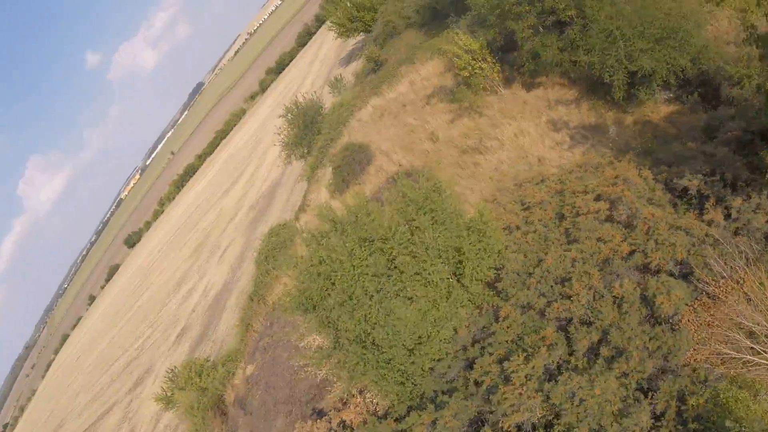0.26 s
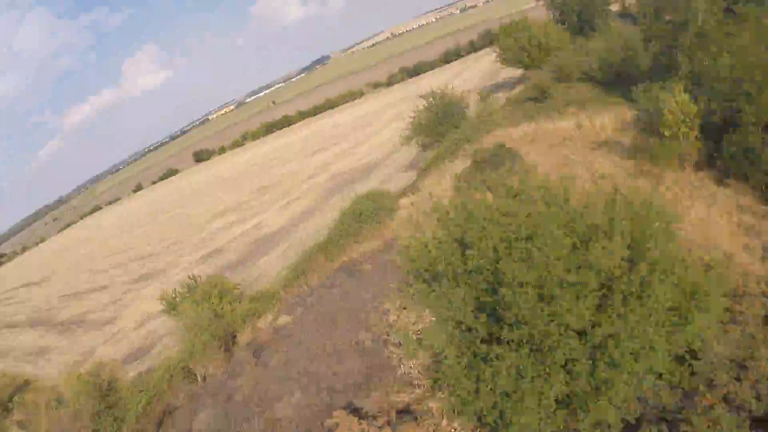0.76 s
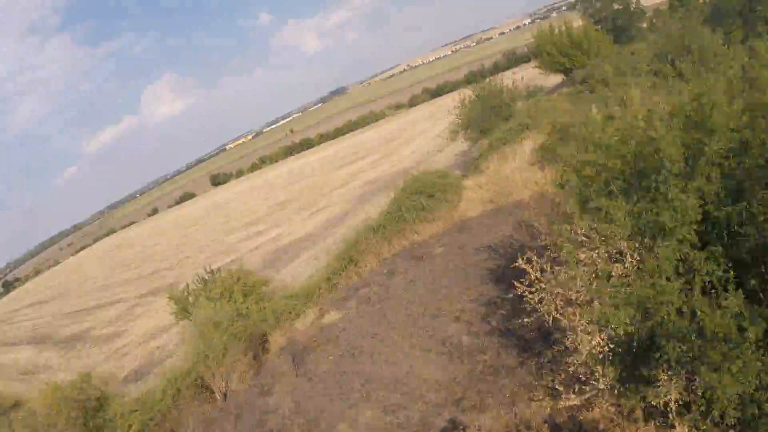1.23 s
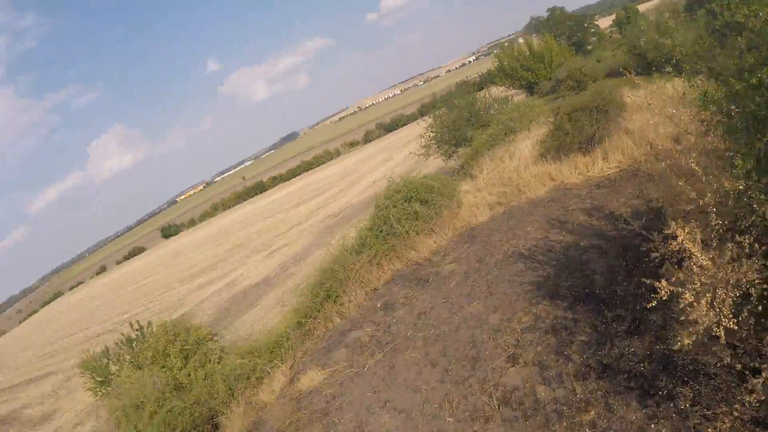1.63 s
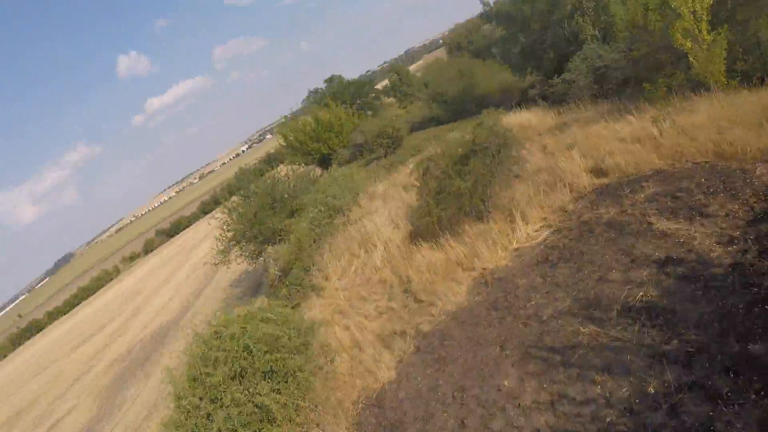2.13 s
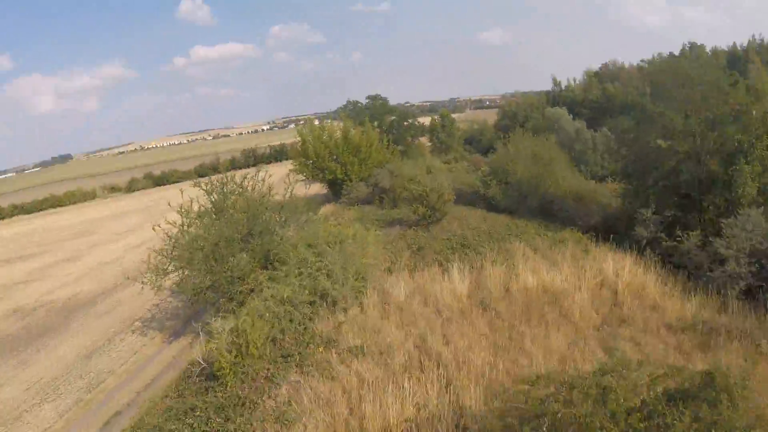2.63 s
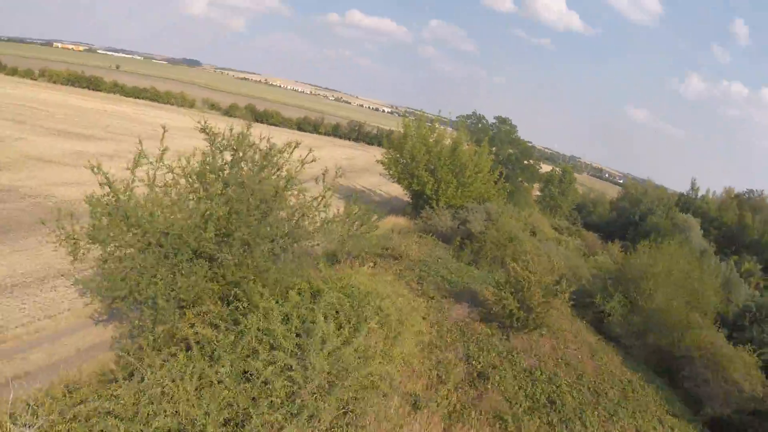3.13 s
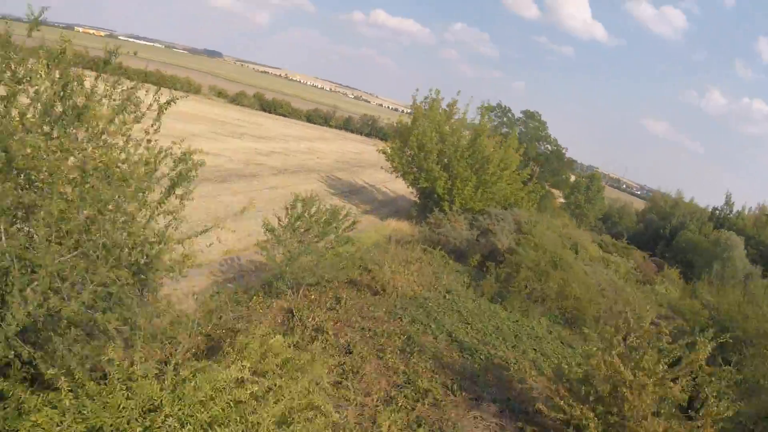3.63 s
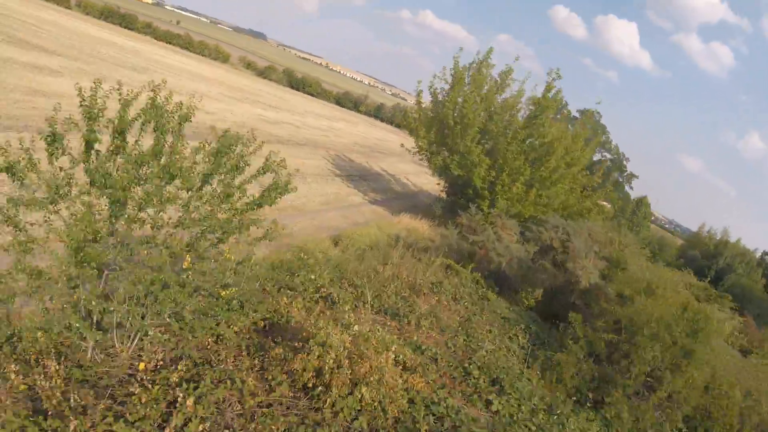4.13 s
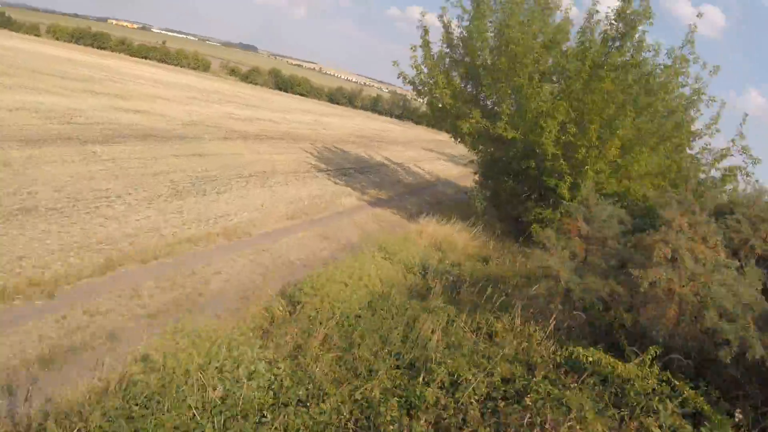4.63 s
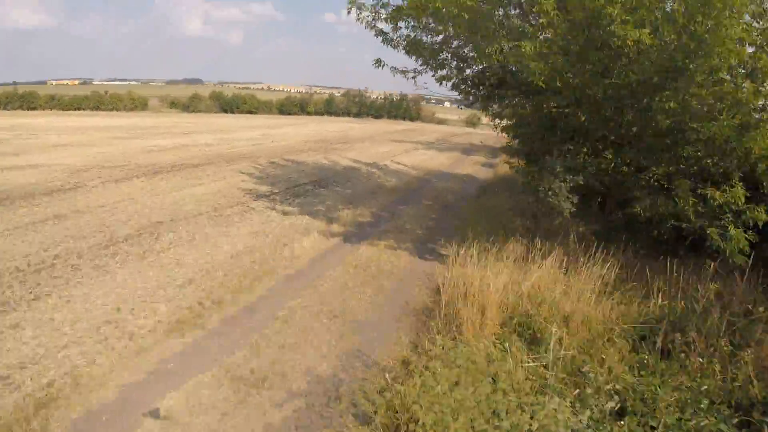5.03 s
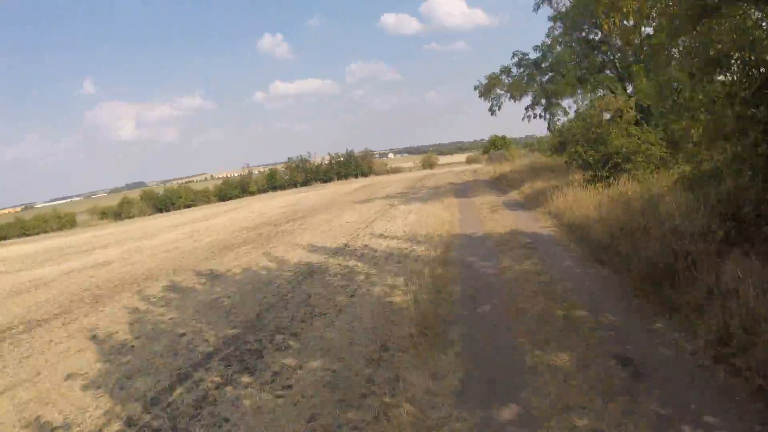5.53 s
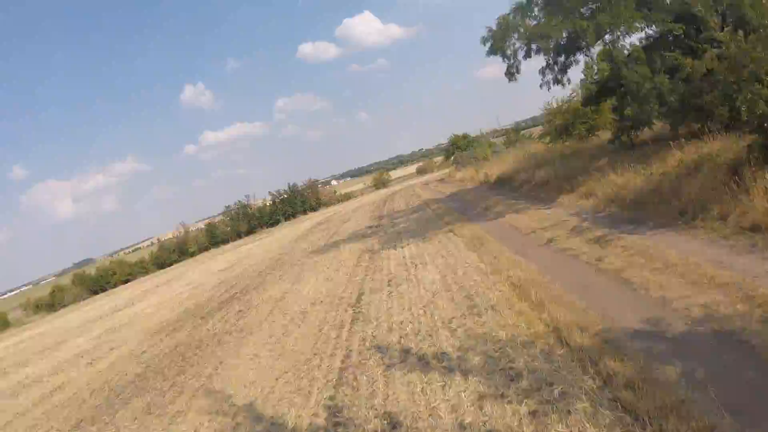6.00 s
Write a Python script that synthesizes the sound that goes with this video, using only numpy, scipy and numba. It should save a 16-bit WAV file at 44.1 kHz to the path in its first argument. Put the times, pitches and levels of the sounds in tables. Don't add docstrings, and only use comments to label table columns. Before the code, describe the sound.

A small racing quadcopter is heard from a camera on its own frame, close and slightly muffled by a sealed case, with peaks held back. At 0 s the motors hum low and uneven, beating against each other, while a puff of dive wind fades within about 0.3 s. Around 0.9-1.3 s the throttle surges: pitch more than doubles into a harsh buzzing whine with rasping blade slap and stronger air hiss, edging higher until about 2.1 s. From 2.2 to 2.5 s it falls quickly to a lower, throbbing drone that holds until 3.8 s, with a faint thin whistle near 2.7 s. It rises again by 4.1 s, with small pushes near 4.3 and 5.2 s, uneven pulsing, and faint high singing tones. From 5.5 s to the end at 6.3 s it stays a dense, steady, beating buzz in rushing air.

```python
import sys
import numpy as np
from scipy import signal
from scipy.fft import rfft, irfft, next_fast_len
from scipy.io import wavfile
from scipy.ndimage import uniform_filter1d
from numba import njit

SR = 44100
rng = np.random.default_rng(int(sys.argv[2]) if len(sys.argv) > 2 else 0)


def put_to_file(sound):
    columns = np.atleast_2d(sound).T
    safe = np.clip(columns, -1, 1)
    whole_steps = np.round(safe * 32767)
    wavfile.write(sys.argv[1], SR, whole_steps.astype(np.int16))


def elevation(decibels):
    levels = np.asarray(decibels, float)
    return 10 ** (levels / 20)


N = 276066
TIME_S = np.arange(N) / SR


def curves(table):
    seconds, *columns = np.transpose(table)
    return [np.interp(TIME_S, seconds, column) for column in columns]


def colour_db(table, hz):
    table_hz, db = np.transpose(table)
    return np.interp(np.log(hz), np.log(table_hz), db)


def gate(start, end, fade=0.037):
    return np.interp(TIME_S, [start - fade, start, end, end + fade], [0, 1, 1, 0])


def walk(per_second):
    hold = int(SR / per_second)
    steps = np.repeat(rng.standard_normal(N // hold + 1), hold)
    return 1.3 * uniform_filter1d(uniform_filter1d(steps, hold), hold)[:N]


def shaft_speed(speed_hz):
    # start in seconds, end in seconds, ease in seconds,
    # change of speed as a share.
    stick = [
        (4.221, 4.369, .11, .065),
        (5.129, 5.269, .13, .045),
        (5.598, 5.629, .1, -.02),
    ]
    inertia_s, hunting_share, jitter_share = .035, .003, 0.00199
    nudges = hunting_share * walk(8)
    for start, end, ease, share in stick:
        nudges = nudges + share * gate(start, end, ease)
    smooth_hz = uniform_filter1d(speed_hz * (1 + nudges), int(inertia_s * SR))
    return smooth_hz * (1 + jitter_share * walk(25.154))


def mount_ring_db(hz):
    # pitch in Hz, width in octaves, boost in dB.
    mount = [
        (260.4, 0.15, 9.5),
        (454, 0.084, 5.5),
        (532.9, 0.051, 10),
        (695, 0.082, 1),
        (900, 0.29, 0.5),
    ]
    return sum(db * np.exp(-(np.log2(hz / centre) / width) ** 2) for centre, width, db in mount)


def motor(number, table, orders_db, buzz_db):
    speed_hz, shake_db, load_db = curves(table)
    hz = shaft_speed(speed_hz)
    angle = 2 * np.pi * np.cumsum(hz) / SR
    wander_db, rough_db = 0.76, 1.8
    shakes = []
    for multiple, order_db, heard_db in zip((1, 2, 3), orders_db, (shake_db, shake_db, load_db)):
        db = order_db + heard_db + mount_ring_db(multiple * hz)
        db = db + wander_db * walk(6) + rough_db * walk(30)
        shakes.append(elevation(db) * np.exp(1j * (multiple * angle + 7 * rng.random())))
    sound = sum(shakes).imag + frame_buzz(hz, angle, buzz_db) + wake_slaps(number, angle)
    running = np.sqrt(2) * gate(table[0][0], table[-1][0])
    return running * sound, running * shakes[0], angle


def frame_buzz(hz, angle, buzz_db):
    # pitch in Hz, level in dB.
    frame = [
        (300, -11.5),
        (450, 0),
        (700, -8),
        (950, -24),
        (1250, -41.5),
        (2200, -39.5),
    ]
    buzz = np.zeros(N)
    for multiple in range(4, 10):
        level = elevation(buzz_db + colour_db(frame, multiple * hz) + 2.5 * walk(5))
        buzz += level * np.sin(multiple * angle + 7 * rng.random())
    return buzz


def wake_slaps(number, angle):
    # motor counted from 0, start in seconds, end in seconds, level in dB,
    # strongest multiple of the turns.
    slaps = [(2, 1.17, 1.88, -40.5, 3.5), (2, 1.6, 2.12, -48, 10.5), (2, 2.22, 2.3, -47, 12.3),
             (1, 1.25, 2.1, -55, 8), (1, 4.15, 5.3, -43, 0), (3, 4.45, 4.95, -44, 0),
             (3, 5.03, 5.45, -57, 14), (3, 5.52, 6.2, -52, 11.5), (2, 5.5, 6.26, -46, 0),
             (0, 2.8, 3.8, -6, -7), (1, 3.0, 3.8, -11, -7)]
    own = [(gate(start, end, fade=.05), db, strongest)
           for who, start, end, db, strongest in slaps if who == number]
    sound = np.zeros(N)
    for multiple in range(6, 24, 3):
        size = sum(on * elevation(db - .2 * (multiple - strongest) ** 2) for on, db, strongest in own)
        uneven = elevation(3 * walk(45) + walk(9))
        sound += size * uneven * np.sin(multiple * angle + 7 * rng.random())
    return sound


def mount_beats(shake):
    return 1.5 * ((shake[1] + shake[3]) ** 2 * np.conj(shake[0])).imag


def airflow():
    # time in seconds, rotor load in dB (from 0.34 to 0.92 s set lower still, as the camera turns #
    # the hiss down under a loud low tone), stirred air drawn back through the rotors in dB.
    flow = [(0, -5.5, 1.5), (.29, -7, 2.5), (.34, -11, -3.5), (.55, -13.5, -1.5), (.92, -13, 0.5),
            (1.0, -7.5, 5), (1.1, 3.5, 0.5), (1.6, 4, 3), (1.92, 3, 7.5), (2.17, 1.5, 4.5), (2.4, -3, 4.5),
            (2.65, -2, 3), (3.1, 4, -1.5), (3.35, 0, 0), (3.8, 0.5, -1), (4.0, 4, -3), (5.0, 3, -1.5),
            (6.26, 1, 3.5)]
    # dB for each dB of load, dB for each dB of stirred air.
    follow = [
        (-.05, -0.19),
        (.2, 0.61),
        (.8, 1.5),
        (1, 0.43),
    ]
    dive_wind_db, dive_wind_s = 8.5, 0.19
    levels_db = np.array(follow) @ np.array(curves(flow))
    levels_db[0] += dive_wind_db * np.exp(-(TIME_S / dive_wind_s) ** 2)
    return levels_db - levels_db.mean(axis=1, keepdims=True)


def air(chop):
    # pitch in Hz, level in dB.
    case = [(12, -50.5), (25, -14.5), (70, -3.5), (200, -8), (290, -6.5), (370, -14.5), (550, -8.5),
            (740, -11.5), (1010, -27), (1700, -35), (4400, -42.5), (7500, -45), (10500, -61), (15000, -90)]
    # pitch in Hz, width in octaves, boost in dB.
    pockets = [
        (2860, 0.077, 2),
        (6080, 0.18, 5),
    ]
    levels_db = airflow()
    source_octaves = np.log2([70, 1300, 3600, 7000])
    size = next_fast_len(N)
    octave = np.log2(np.fft.rfftfreq(size, 1 / SR) + 1)
    noise = rfft(rng.standard_normal(size)) * elevation(colour_db(case, 2 ** octave))
    for hz, width, db in pockets:
        noise *= elevation(db * np.exp(-((octave - np.log2(hz)) / width) ** 2))
    gusts = walk(30)
    flutter = gusts - uniform_filter1d(gusts, SR // 8)
    sound = np.zeros(N)
    for centre in np.arange(4, 14.1, .5):
        band_shape = np.cos(np.pi / 2 * np.clip(2 * (octave - centre), -1, 1)) ** 2
        band = irfft(noise * band_shape, size)[:N]
        share = np.array([np.interp(centre, source_octaves, row) for row in np.eye(4)])
        washy = share[2] + share[3]
        steep = np.interp(centre, [12.8, 13.6], [1, 1.5])
        db = steep * (share @ levels_db + 1.5 * washy * flutter) + .6 * walk(40)
        sound += elevation(db) * band * (1 + 0.21 * washy * chop)
    return elevation(-20) * sound / np.sqrt(np.mean(sound ** 2))


def whistles():
    # start in seconds, end in seconds, start pitch in Hz, end pitch in Hz, level in dB.
    songs = [(0.205, 0.23, 5830, 5900, -66), (0.312, 0.566, 5890, 5750, -63.5), (.89, .92, 5820, 5900, -61),
             (0.355, .5, 7250, 7300, -84), (0.499, 0.608, 7300, 6780, -70.5),
             (0.607, 0.682, 6780, 6822, -70.5), (2.64, 2.95, 6540, 7400, -55),
             (4.117, 4.45, 7203, 7250, -60), (5.05, 5.301, 7357, 7207, -57)]
    sound = np.zeros(N)
    for start, end, start_hz, end_hz, db in songs:
        glide_hz = np.interp(TIME_S, [start, end], [start_hz, end_hz])
        hz = glide_hz * (1 + .005 * walk(45))
        level = gate(start, end, fade=.01) * elevation(db + 2.5 * walk(40))
        sound += level * np.sin(2 * np.pi * np.cumsum(hz) / SR)
    return np.sqrt(2) * sound


def scene():
    # time in seconds, shaft speed in Hz, shaft shake in dB, blade load in dB.
    motor_tables = ([(0, 89.84, -18, -7.5), (.55, 99.43, -15.5, -15), (.8, 89.05, -23.5, 4.5),
                     (.89, 90.64, -23.5, 11.5), (.97, 102.7, -11.5, 12), (1.06, 130.8, -1.5, 10),
                     (1.17, 176.9, -10.5, 5), (1.24, 182.1, -4, 0.5), (1.3, 207, -2, 8.5),
                     (1.7, 235.8, -7.5, -4), (2.16, 246.1, -3, -14), (2.3, 191.4, 1, -2.5),
                     (2.52, 154.5, -1.5, 1.5), (3.81, 153.6, 0.5, 3), (4.13, 196.9, 1, 3),
                     (5.0, 199.5, 0.5, -4), (5.5, 189.4, -0.5, 1.5), (6.26, 190.5, 0.5, -1.5)], [(0, 80.3, -7.5, 3.5), (0.241, 75.54, 2, -14), (0.299, 83, 1.5, 9.5),
                                      (0.481, 87.34, -0.5, 9), (0.718, 77.87, -7.5, 7), (.8, 77.4, -8, -14),
                                      (1.0, 127.8, 11, -9), (1.2, 212.5, -17.5, 0.5), (1.309, 229.4, 3, 3),
                                      (1.5, 265.9, 0, -8.5), (2.2, 269.7, 0, -12),
                                      (2.54, 168.1, -5.5, -4.5), (3.4, 177.8, 4, -7),
                                      (3.81, 178.2, -1, -5.5), (4.13, 228.3, -3, 3), (4.6, 228.1, 1, -5.5),
                                      (5.051, 243.1, 1.5, -7.5), (6.26, 249.6, 2, -6)], [(0, 111, 1.5, -12), (0.301, 127.6, 3.5, -13),
                                                       (.8, 121, 5, -16.5), (1.0, 160, -13, 2),
                                                       (1.12, 233, 0.5, 3.5), (1.2, 263, 3.5, 8.5),
                                                       (1.28, 278, 2.5, 6), (1.55, 299, 5, -3.5),
                                                       (1.8, 299, 1, -5.5), (2.119, 312, -7, -13.5),
                                                       (2.2, 301.4, -2, -5.5), (2.37, 194.7, -5, -7),
                                                       (2.648, 156.2, 5, -5.5), (3.4, 167.4, -6, -6),
                                                       (3.81, 164, -10, -4.5), (4.128, 226, -11.5, 7),
                                                       (5.0, 224.7, 1, 1), (6.26, 223, 4, -4.5)], [(2.3, 204.4, 3, -15),
                                                                        (2.55, 160, 1.5, -7.5),
                                                                        (3.0, 157.8, 2.5, -1),
                                                                        (3.81, 160.1, 3.5, 1),
                                                                        (4.12, 227.3, 1.5, 5.5),
                                                                        (4.222, 228.6, 9, -3.5),
                                                                        (4.301, 228.1, -5, -4.5),
                                                                        (4.38, 228, 10.5, 2),
                                                                        (4.501, 226.5, -3.5, 4.5),
                                                                        (4.701, 231, 6.5, 1),
                                                                        (4.85, 236.9, 3.5, 3),
                                                                        (4.999, 243, 2.5, 4),
                                                                        (5.081, 246.6, 1.5, 0),
                                                                        (5.201, 243.2, -0.5, 0),
                                                                        (5.55, 231.5, 2, 0),
                                                                        (5.9, 235.1, -1, 0),
                                                                        (6.26, 238, 0, -2)])
    # unbalance in dB, twice-per-turn shake in dB, blade pass in dB.
    orders = [
        (-12.5, -20.5, -26),
        (-26.5, -31.5, -24.5),
        (-25.5, -33.5, -29.5),
        (-23, -37, -28),
    ]
    buzz_db = (-28, -26, -30, -32)
    sounds, shake, angles = zip(*map(motor, range(4), motor_tables, orders, buzz_db))
    chop = sum(np.cos(angle) for angle in angles) / 2
    return (sum(sounds) + mount_beats(shake) + air(chop) + whistles())[None]


@njit
def limiter(x, top, ratio, attack, release, ahead):
    y, envelope = np.empty(len(x)), top
    for i in range(len(x)):
        coming = abs(x[min(i + ahead, len(x) - 1)])
        envelope += (coming - envelope) * (attack if coming > envelope else release)
        y[i] = x[i] * min(1., (top / envelope) ** (1 - 1 / ratio))
    return y


def roll_off(x):
    return signal.sosfilt(signal.butter(12, 14860, fs=SR, output="sos"), x)


def record(dry):
    held = limiter(dry[0], .82, 12., .05, .0009, int(.002 * SR))
    held *= np.minimum(1, np.arange(N) / (.0015 * SR) + .1)
    ceiling = .98
    clipped = held / (1 + (held / ceiling) ** 8) ** (1 / 8)
    return roll_off(clipped[None])


dry = scene()
out = record(dry)
put_to_file(out)
```